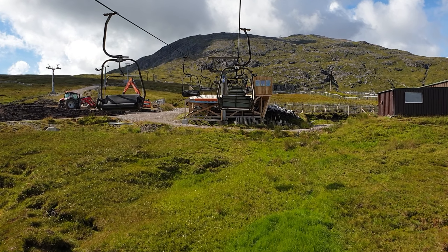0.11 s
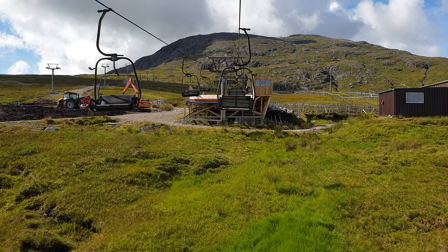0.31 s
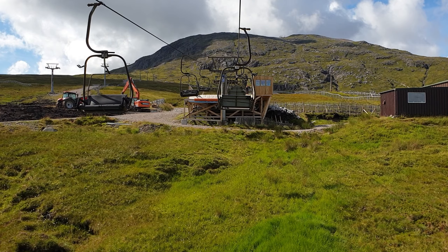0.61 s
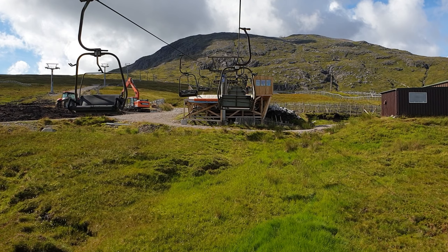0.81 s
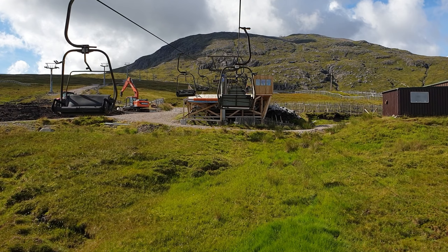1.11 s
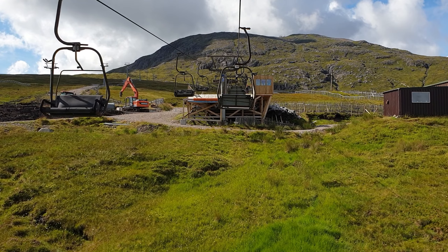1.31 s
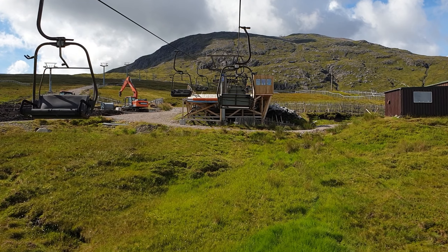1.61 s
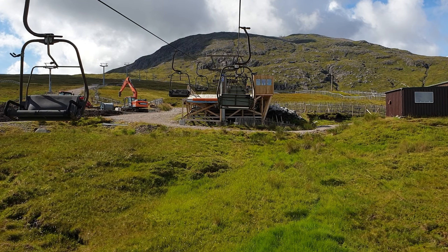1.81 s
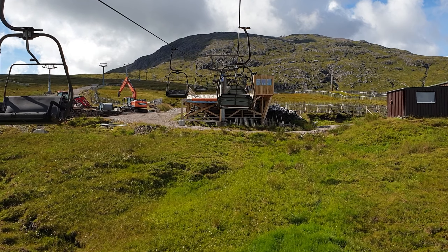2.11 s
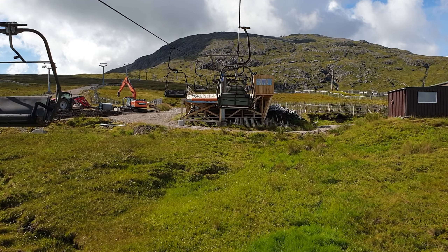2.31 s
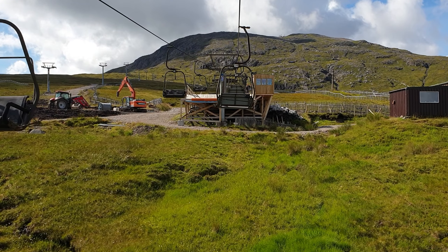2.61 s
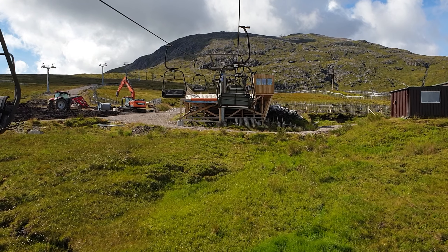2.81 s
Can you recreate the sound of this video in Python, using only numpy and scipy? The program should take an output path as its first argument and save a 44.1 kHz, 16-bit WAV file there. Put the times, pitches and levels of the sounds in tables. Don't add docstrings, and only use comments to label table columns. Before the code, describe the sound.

Low wind thumps strike the right side of an outdoor stereo microphone, busiest in the middle, while a chairlift drive hums steadily underneath, rope wheels hiss faintly and a few tiny dry ticks come from a chair.

```python
import sys
import numpy as np
from scipy import signal
from scipy.fft import rfft, irfft, next_fast_len
from scipy.io import wavfile
from scipy.ndimage import uniform_filter1d, map_coordinates

SR = 44100
rng = np.random.default_rng(int(sys.argv[2]) if len(sys.argv) > 2 else 0)


def volts(x):
    e = np.asarray(x, float) / 20
    return 10 ** e


def inscribe(sig):
    pcm = np.round(np.clip(np.atleast_2d(sig).T, -1, 1) * 32767)
    wavfile.write(sys.argv[1], SR, pcm.astype(np.int16))


N = 130095
T = np.arange(N) / SR

ENGINE_ORDERS = [4, 8, 14, 18, 20, 21, 23, 24, 25, 26, 28, 41, 49, 52, 54, 59, 68, 72, 76, 105, 113, 121,
                 158, 168, 172, 216, 360, 432]
# (left level [dB], right level [dB])
ORDER_LEVELS = [(-53.5, -52), (-55.5, -54.5), (-65, -62.5), (-70.5, -68), (-70, -66), (-69, -65),
                (-76.5, -70), (-67, -61.5), (-78.5, -69.5), (-85.5, -75.5), (-83, -71.5), (-86.5, -78.5),
                (-71, -77), (-75.5, -78), (-77, -74), (-75.5, -72.5), (-99.5, -85.5), (-101, -74.5),
                (-102, -75), (-80, -80), (-101, -89), (-80.5, -78), (-86, -84.5), (-100.5, -81), (-91, -84),
                (-94, -86.5), (-99, -92), (-122, -107)]
# (frequency [Hz], share [0-1])
DIFFUSE_SHARE = [(100, 0.036), (600, 0.14), (1500, 0.41), (4000, 0.63)]
# (frequency [Hz], width [Hz], level [dB])
HOUSING_LEFT = [(123, 106, 13.5), (216, 44, 6), (334, 40, -5.5), (600, 100, -16.5), (800, 163, 1.5),
                (920, 820, -12.5), (1540, 270, -9.5), (2020, 62, -15), (2398, 83, -8), (3080, 490, -19.5)]
HOUSING_RIGHT = [(112, 123, 16.5), (213, 81, 8.5), (338, 75, 3), (565, 83, -4), (782, 156, 5.5),
                 (1017, 136, 2.5), (1760, 373, -2.5), (2570, 436, -7.5), (3380, 240, -27)]
# (time [s], level [dB])
ENGINE_APPROACH = [
    (0.1, -70.5),
    (.45, -71),
    (.75, -71.5),
    (1.4, -71),
    (1.65, -70.5),
    (1.9, -70),
    (2.4, -70),
    (2.85, -69),
]
# (time [s], gain [dB])
HOUSING_BRIGHTNESS = [
    (0, -7),
    (.7, 1),
    (1.5, 1),
    (2.2, -0.5),
    (2.95, 1.5),
]
# (frequency [Hz], width [Hz], level [dB])
SHEAVE_LEFT = [(4340, 700, 6), (5120, 640, 7), (6040, 870, 7.5), (6680, 430, 9), (7450, 670, 6.5)]
SHEAVE_RIGHT = [(3523, 330, 6), (4290, 310, 1.5), (4570, 640, 1), (5450, 840, 0), (6440, 450, 4)]
# (time [s], level [dB], left over right [dB])
SHEAVE_LEVELS = [
    (0.1, -78.5, -2),
    (0.4, -78, -6.5),
    (0.7, -73, -6.5),
    (0.78, -76, -9),
    (0.96, -72, -7.5),
    (1.49, -76, -3),
    (2.17, -73.5, -7),
    (2.38, -73, -1.5),
    (2.84, -72, -1.5),
    (2.85, -71.5, -2),
]
# (frequency [Hz], density [dB])
RUMBLE_SPECTRUM = [(22, -19), (36, 8.5), (60, -7), (120, -3), (250, -19.5), (500, -31), (900, -59)]
# (time [s], level [dB])
GUST_LEVELS = [
    (0, -47.5),
    (.3, -47),
    (.6, -46.5),
    (1, -41),
    (1.5, -43.5),
    (1.85, -48),
    (2.1, -40.5),
    (2.5, -46),
    (2.95, -50.5),
]
# (middle [s], length [s], peak [dB], pitch [Hz])
SLOW_EDDIES_LEFT = [
    (.065, 0.024, -42, 212),
    (1.755, .03, -40, 148),
    (1.475, 0.11, -31.5, 55),
    (2.405, 0.069, -39, 65),
    (2.47, 0.046, -37.5, 91),
    (2.69, 0.064, -38, 48.7),
]
SLOW_EDDIES_RIGHT = [(.222, 0.034, -36.5, 66), (.298, .03, -35, 60.5), (.412, 0.023, -37, 60),
                     (.443, 0.021, -34.5, 70), (.611, 0.016, -26.5, 79), (.668, 0.026, -30, 84),
                     (.722, 0.02, -27, 65), (.82, 0.025, -28.5, 49.3), (.91, 0.024, -25.5, 79.4),
                     (.932, 0.048, -24.5, 64.3), (1.015, 0.046, -28.5, 72), (1.145, 0.025, -42, 90),
                     (1.334, 0.0067, -20.5, 131), (1.348, 0.02, -22, 75), (1.366, 0.035, -22, 62),
                     (1.424, 0.018, -28.5, 70), (1.222, 0.022, -31.5, 70), (1.26, .02, -30, 60.3),
                     (.995, .04, -31, 49.3), (2.235, 0.027, -31.5, 70), (2.375, .03, -33, 60),
                     (1.602, 0.04, -28.5, 64.5), (1.957, 0.036, -31, 72.4), (.77, 0.028, -32, 57.4),
                     (2.005, 0.016, -33, 70), (2.08, 0.016, -31, 68.6), (2.103, 0.036, -31.5, 65),
                     (2.151, .016, -24, 65), (2.337, 0.014, -29, 80), (2.353, .014, -31, 75),
                     (2.41, 0.01, -28, 71.5)]
# (middle [s], length [s], peak [dB], pitch [Hz])
SUCTION_EDDIES = [(.259, 0.023, -32.5, 90), (.334, 0.011, -39, 110), (.46, 0.022, -32.5, 85),
                  (.505, 0.034, -32.5, 69), (.69, 0.011, -25.5, 91), (.902, 0.019, -31, 94),
                  (.992, 0.01, -21.5, 122), (1.05, 0.023, -31, 100), (1.103, 0.018, -25, 69),
                  (1.251, .014, -31, 99), (1.34, 0.011, -25.5, 90), (1.4155, 0.0061, -26, 200),
                  (1.433, 0.014, -28.5, 75), (1.64, 0.033, -28, 75), (1.666, 0.0088, -23.5, 149),
                  (1.686, 0.014, -23, 124), (1.70, .025, -28.5, 70), (1.753, 0.016, -24, 69),
                  (2.011, 0.0085, -22, 110), (2.026, 0.018, -21, 84.6), (2.143, .016, -22, 75),
                  (2.161, .016, -27, 65), (2.346, .014, -27, 80), (2.362, .014, -30, 75),
                  (1.202, .014, -31, 80), (.732, .016, -28, 70), (2.278, 0.015, -33.5, 80),
                  (2.33, 0.012, -25, 86), (2.44, 0.018, -37, 80), (2.585, 0.039, -37.5, 112)]
# (time [s], peak [dB])
JOINT_TICKS = [
    (0.628, -66),
    (.648, -70),
    (0.7205, -66),
    (0.9655, -62),
    (0.976, -68),
    (1.0994, -72),
    (1.457, -70),
    (2.4704, -69),
    (2.566, -70),
    (2.663, -66),
]
# (frequency [Hz], width [Hz], level [dB])
JOINT_RESONANCES = [(7400, 550, -6), (13000, 5000, 0.19)]
# (middle [s], peak [dB], pitch [Hz])
EDDY_FLICKS = [(0.658, -25, 169), (.964, -30, 248), (1.032, -30, 189), (1.412, -22.5, 216),
               (1.418, -33, 234), (1.978, -28, 417), (1.339, -36, 397), (1.414, -31.5, 477),
               (1.186, -30, 260), (2.239, -36, 330), (2.237, -20.5, 180), (2.31, -34, 194),
               (2.324, -30, 227)]
# (time [s], peak [dB], starting pitch [Hz], time to peak [s])
SHARP_EDDIES = [
    (1.1844, -20.5, 230, 0.0059),
    (1.9737, -13, 216, 0.0066),
]
# (time [s], peak [dB])
PIN_RINGS = [
    (.738, -74),
    (1.308, -71),
    (1.336, -75),
    (1.364, -70),
    (1.391, -73),
    (1.418, -71),
    (1.445, -75),
]
# (frequency [Hz], density [dB])
HISS_SPECTRUM = [(2500, -30), (6000, -10), (8100, 7), (9400, 9), (10600, 14), (12400, 16), (14500, 15),
                 (16000, 12)]

CYCLE_HZ, SPEED_DRIFT = 15.166, 0.00079
ORDER_SWAY_DB, ORDER_BLUR_TURNS = 2, 0.003
REPEATING_SHARE = 0.22
FIRING_DB, PAIR_DB = 1, 1
ENGINE_LAG_S, SHEAVE_LAG_S = -0.0001, -0.00012
HOUSING_DB = (-50.5, -49)
BRIGHT_HZ = 1990
SHEAVE_DB, SHEAVE_PATCH_DB, SHEAVE_SHARED = 3.5, 1.5, 0.89
LEE_DB, LEE_SWING = -54.5, 0.32
LUMPS_DB, RUMBLE_TOP_HZ = 4, 2500
EDDY_TOP_HZ, EDDY_SAG = 560, 0.18
FLICK_CYCLES = 1.34
SNAP_FALL_S, SNAP_END_HZ = 0.0043, 50
TICK_T60_S, TICK_LEFT_DB, TICK_RIGHT_DB = 0.013, -6.5, -14.5
PING_HZ, PING_T60_S, PING_RISE_S = 12550, 0.02, 0.0006
HISS_DB, HISS_RIGHT_DB = -79.5, 0.8
LOW_CUT_HZ, TOP_HZ = 29, 15730


def stereo(left, right):
    return np.array([[left], [right]])


def unit(x):
    return x / np.sqrt(np.mean(x ** 2, axis=-1, keepdims=True) + 1e-20)


def curves(rows):
    times, *columns = np.transpose(rows)
    return [np.interp(T, times, column) for column in columns]


def wobble(rate):
    knots = rng.standard_normal(int(N * rate / SR) + 4)
    return map_coordinates(knots, [T * rate])


def filtered(x, response):
    m = next_fast_len(N + SR // 2)
    hz = np.fft.rfftfreq(m, 1 / SR)
    return irfft(rfft(x, m) * response(hz), m)[..., :N]


def coloured(points):
    f, db = np.transpose(points)

    def gain(hz):
        return volts(np.interp(np.log(hz + 1), np.log(f), db, left=-120))

    return unit(filtered(rng.standard_normal((2, N)), gain))


def resonant(x, left, right, lag_s=0):
    def peak(f, centre, width):
        damping = (f * width) ** 2
        return (damping / ((centre * centre - f * f) ** 2 + damping)) ** 2

    def response(f):
        power = [sum(volts(db) ** 2 * peak(f, centre, 1.264 * width) for centre, width, db in side)
                 for side in (left, right)]
        return np.sqrt(power) * np.exp(-2j * np.pi * f * stereo(lag_s, 0))

    return unit(filtered(x, response))


def engine_orders(turns):
    lag_turns = CYCLE_HZ * stereo(ENGINE_LAG_S, 0)
    tones = np.zeros((2, N))
    for order, (left_db, right_db) in zip(ENGINE_ORDERS, ORDER_LEVELS):
        level = volts(stereo(left_db, right_db) + 5.0 + ORDER_SWAY_DB * wobble(14))
        blur = ORDER_BLUR_TURNS * min(order, 60) * wobble(20)
        phase = order * (turns - lag_turns) + blur + rng.random()
        tones += level * np.sin(2 * np.pi * phase)
    return tones


def housing_rush(turns):
    size = round(SR / 15)
    pattern = unit(map_coordinates(rng.standard_normal(size), [turns % 1 * size], mode="grid-wrap"))
    fresh = rng.standard_normal(N)
    direct = np.sqrt(REPEATING_SHARE) * pattern + np.sqrt(1 - REPEATING_SHARE) * fresh

    f, share = np.transpose(DIFFUSE_SHARE)

    def unlike(hz):
        return np.interp(np.log(hz + 1), np.log(f), share)

    drive = filtered(direct, lambda hz: np.sqrt(1 - unlike(hz)))
    drive = drive + filtered(rng.standard_normal((2, N)), lambda hz: np.sqrt(unlike(hz)))
    throb_db = FIRING_DB * np.cos(2 * np.pi * 4 * turns) + PAIR_DB * np.cos(2 * np.pi * 2 * turns)
    housing = resonant(drive * volts(throb_db), HOUSING_LEFT, HOUSING_RIGHT, ENGINE_LAG_S)

    bright_db, = curves(HOUSING_BRIGHTNESS)
    upper = filtered(housing, lambda hz: 1 / (1 + (BRIGHT_HZ / (hz + 1)) ** 4))
    housing = housing + (volts(bright_db) - 1) * upper
    near_db, = curves(ENGINE_APPROACH)
    return volts(stereo(*HOUSING_DB) + near_db - near_db.mean()) * housing


def engine():
    turns = np.cumsum(CYCLE_HZ * (1 + SPEED_DRIFT * wobble(1.87))) / SR
    return engine_orders(turns) + housing_rush(turns)


def sheaves():
    noise = rng.standard_normal((2, N)) + SHEAVE_SHARED * rng.standard_normal(N)
    z = signal.stft(noise, nperseg=512)[2]
    patches = uniform_filter1d(rng.standard_normal(z.shape), 8, axis=1)
    patches = uniform_filter1d(patches, 12, axis=2)
    z = z * volts(SHEAVE_PATCH_DB * patches / patches.std())
    noise = signal.istft(z, nperseg=512)[1][:, :N]
    level_db, pan_db = curves(SHEAVE_LEVELS)
    level = volts(SHEAVE_DB + level_db + np.array([pan_db, 0 * pan_db]))
    return level * resonant(noise, SHEAVE_LEFT, SHEAVE_RIGHT, SHEAVE_LAG_S)


def wind():
    gust_db, = curves(GUST_LEVELS)
    lee_db = LEE_DB + LEE_SWING * (gust_db - gust_db.mean())
    lumps = volts(LUMPS_DB * np.array([wobble(14), wobble(14)]))
    rumble = unit(lumps * coloured(RUMBLE_SPECTRUM + [(RUMBLE_TOP_HZ, -120)]))
    right = slow_eddies(SLOW_EDDIES_RIGHT) - slow_eddies(SUCTION_EDDIES) + sharp_eddies()
    eddies = np.array([slow_eddies(SLOW_EDDIES_LEFT), right])
    eddies = filtered(eddies, lambda hz: 1 / (1 + (hz / EDDY_TOP_HZ) ** 6))
    return volts(np.array([lee_db, gust_db])) * rumble + eddies


def slow_eddies(rows):
    out = np.zeros(N)
    for middle, length, db, hz in rows:
        t = T - middle
        cycles = hz * t * (1 - EDDY_SAG * t / length)
        out += volts(db) * np.cos(2 * np.pi * cycles) * np.exp(-(2.31 * t / length) ** 2)
    return out


def ticks():
    shape = np.zeros(N)
    for start, db in JOINT_TICKS:
        shape += volts(db - 60 * np.maximum(T - start, 0) / TICK_T60_S) * (T >= start)
    noise = resonant(rng.standard_normal(N), JOINT_RESONANCES, JOINT_RESONANCES)
    return volts(stereo(TICK_LEFT_DB, TICK_RIGHT_DB)) * shape * noise


def sharp_eddies():
    out = slow_eddies([(middle, FLICK_CYCLES / hz, db, hz) for middle, db, hz in EDDY_FLICKS])
    for start, db, hz, peak_s in SHARP_EDDIES:
        t = np.maximum(T - start, 0)
        glide = (hz - SNAP_END_HZ) * SNAP_FALL_S * (1 - np.exp(-t / SNAP_FALL_S))
        swing = (t / peak_s * np.exp(1 - t / peak_s)) ** 0.85
        out += volts(db) * swing * np.sin(2 * np.pi * (SNAP_END_HZ * t + glide))
    return out


def pings():
    ring = np.zeros(N)
    for start, db in PIN_RINGS:
        t = np.maximum(T - start, 0)
        envelope = volts(db - 60 * t / PING_T60_S) * (1 - np.exp(-t / PING_RISE_S))
        ring += envelope * np.sin(2 * np.pi * PING_HZ * t)
    return volts(stereo(3, -9)) * ring


def scene():
    return engine() + sheaves() + wind() + ticks() + pings()


def roll_off(x):
    return signal.sosfilt(signal.butter(12, 15760, fs=SR, output="sos"), x)


def record(dry):
    hiss = volts(HISS_DB + stereo(0, HISS_RIGHT_DB)) * coloured(HISS_SPECTRUM)

    def band(hz):
        return (hz < TOP_HZ) / np.sqrt(1 + (LOW_CUT_HZ / (hz + 1)) ** 8)

    mix = filtered(dry + hiss, band)
    return roll_off(mix)


dry = scene()
out = record(dry)
inscribe(out)
```